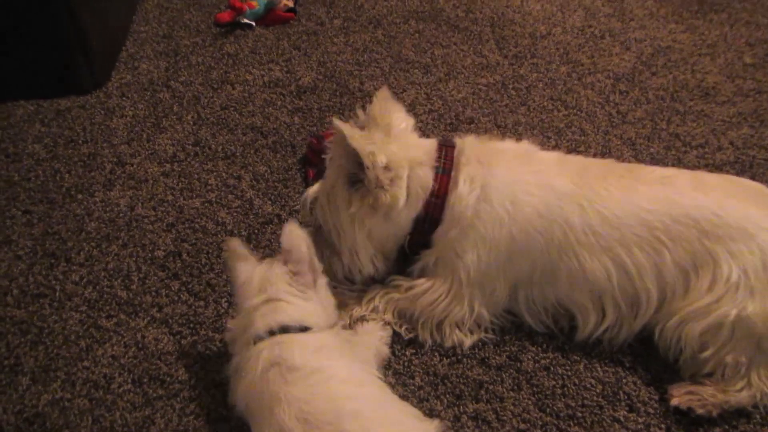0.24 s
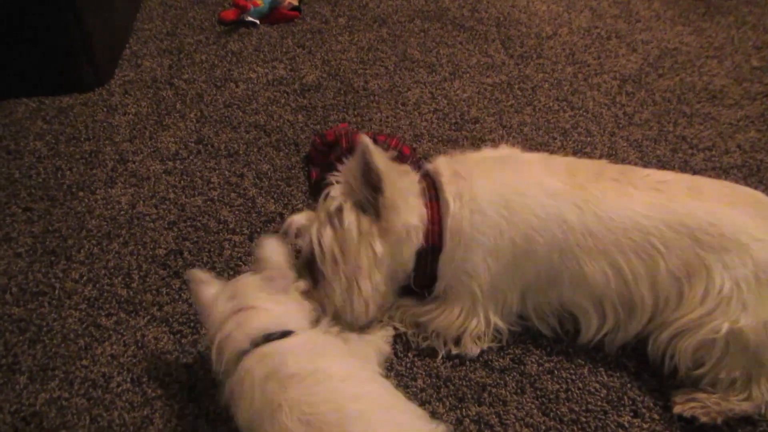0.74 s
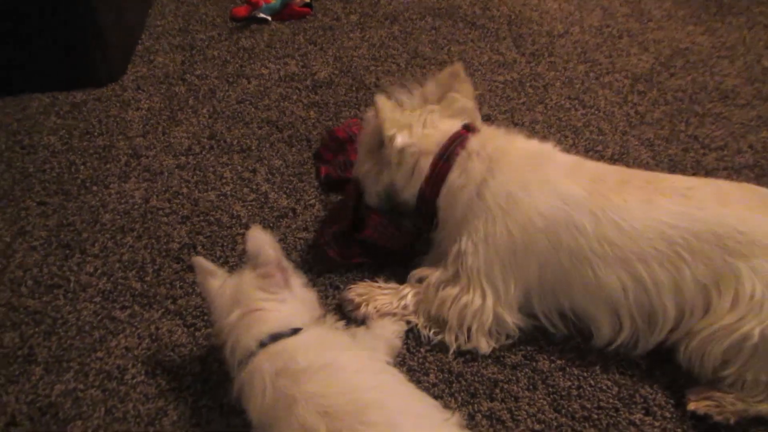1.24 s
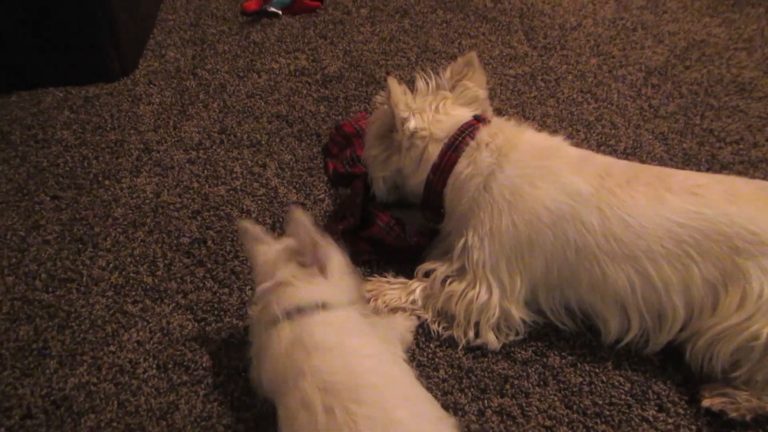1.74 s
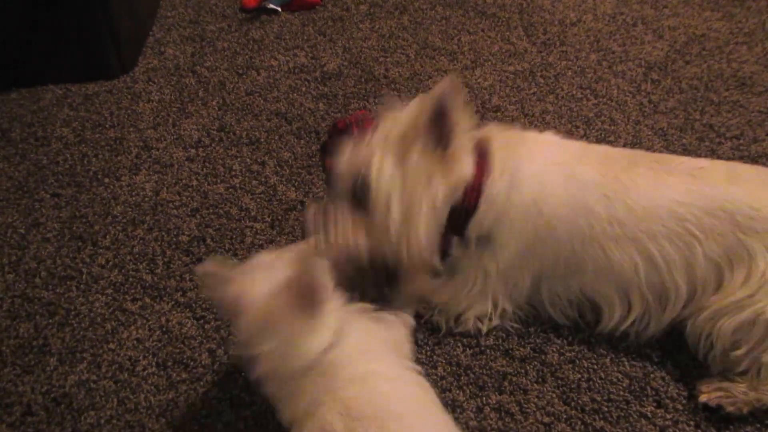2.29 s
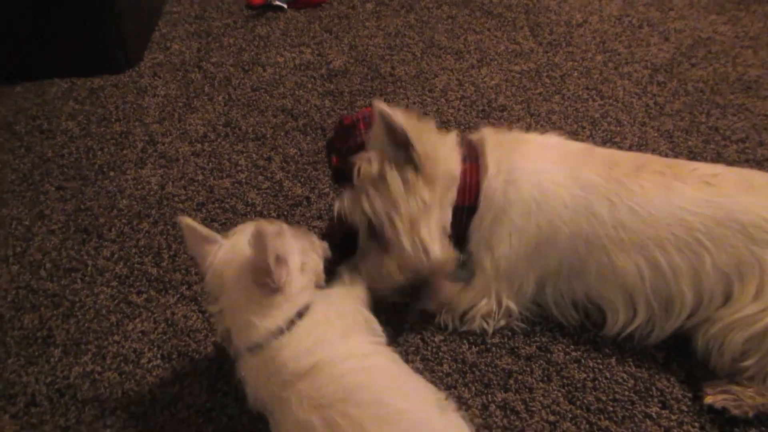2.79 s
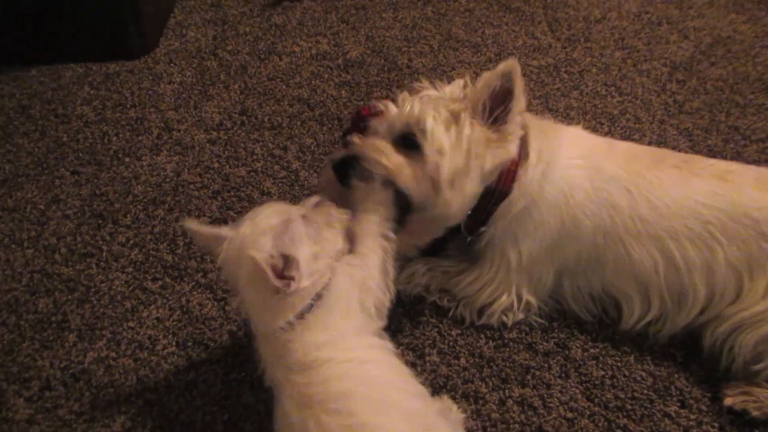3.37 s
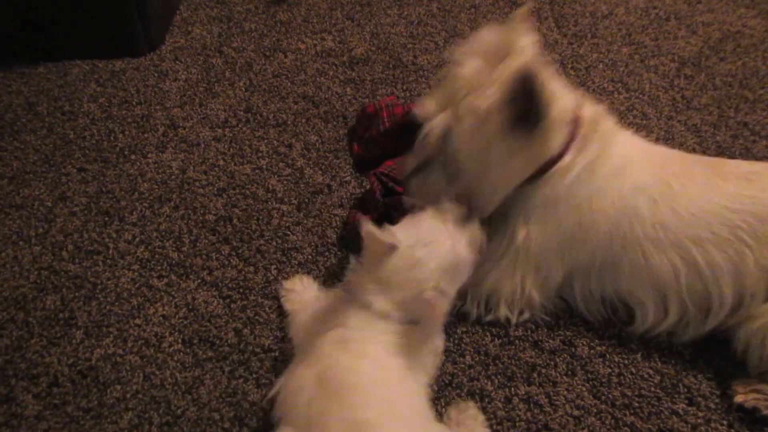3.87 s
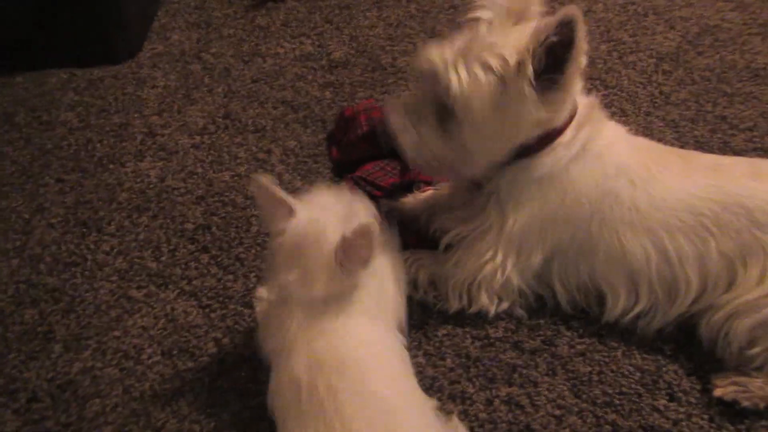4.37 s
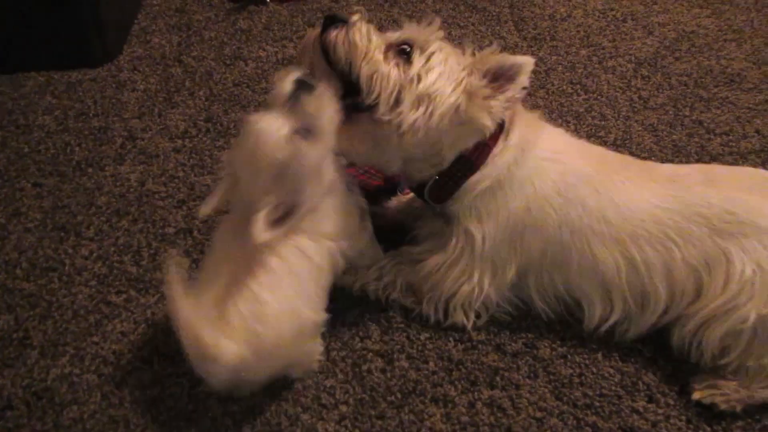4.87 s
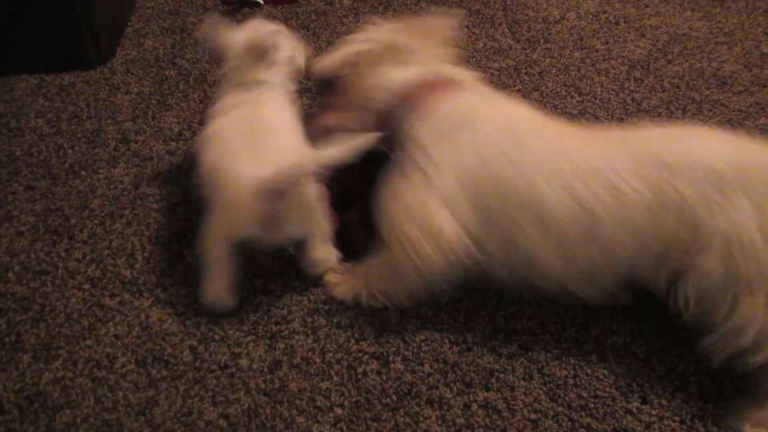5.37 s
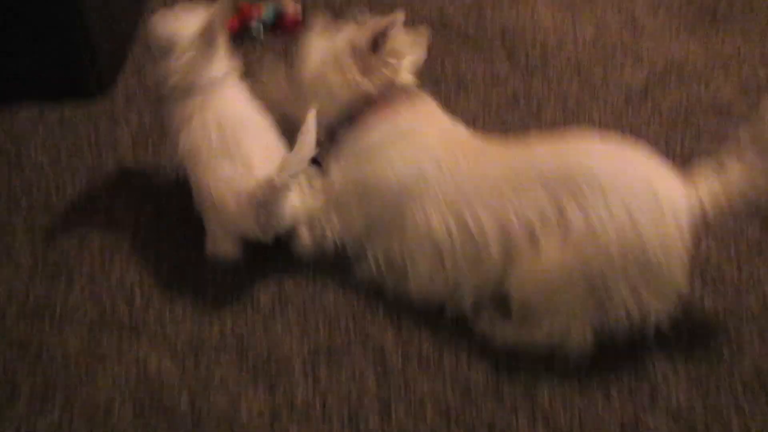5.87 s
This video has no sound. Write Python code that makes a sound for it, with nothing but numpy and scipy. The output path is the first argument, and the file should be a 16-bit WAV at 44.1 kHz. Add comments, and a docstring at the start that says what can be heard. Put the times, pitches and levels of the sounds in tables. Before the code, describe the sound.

Close by in a quiet carpeted living room, two small dogs play over a cloth toy. At first there is mostly low room air, hiss, faint ticks and soft wet mouth sounds. A crisp tag jingle comes around two seconds, then a bump. From four seconds tag clinks, jaw snaps and thuds gather, ending in rustling, scraping and smacking. The room barely echoes.

```python
"""Two small dogs tussle over a soft toy on the carpet of a quiet living room, close to the microphone.
Nearest are a collar tag (clacks against a buckle and beating ring modes) and jaws (resonances of the mouth).
Claws and teeth tick and scrape as noise or clicks through narrow resonances; bumps are damped low modes.
Coats scuff the pile as random fibre slips over floor rumble, and the room answers faintly.
Behind them lie room air, the faint wavering tone of a fan, and microphone hiss."""
import sys
import numpy as np
from scipy import signal
from scipy.fft import rfft, irfft, next_fast_len
from scipy.io import wavfile
from scipy.ndimage import uniform_filter1d

SR = 44100
rng = np.random.default_rng(int(sys.argv[2]) if len(sys.argv) > 2 else 0)


def persist_wave(psi):
    """Save psi, clipped to +-1, as 16-bit WAV."""
    counts = np.round(np.clip(psi, -1, 1) * 32767).astype(np.int16)
    wavfile.write(sys.argv[1], SR, np.atleast_2d(counts).T)


N = 271001
TIME = np.arange(N) / SR  # s

# Tag strikes; the place hit decides which modes sound, and fur how long. Columns: [t/s, clack level/dB,
# clack tilt/dB per octave, middle mode level/dB, top mode level/dB (modes before a 3 dB trim), top mode t60/s]
TAG_STRIKES = [(2.1690, -25.5, -1, -70, -65, .1), (2.1716, -20.5, -3.5, -27, -24.5, 0.19),
               (2.1906, -22, 5, -19, -20, 0.31), (2.4320, -60, 15, -51, -72, .2),
               (3.9741, -34.5, -3, -66, -38.5, 0.32), (4.6748, -27.5, 3.5, -52, -31.5, 0.42),
               (4.9406, -28.5, 3, -64, -42.5, 0.8), (5.2423, -31.5, -6, -68, -44, 0.43),
               (5.5100, -49, 4, -46, -54, .2), (5.5980, -48, 5, -68, -54, .2),
               (5.622, -43, -3, -54, -51, 0.31)]
# Ring modes of the tag, low to high: [f/Hz, share of the strike's t60, split/Hz between twin shapes]
TAG_MODES = [(11475, .42, 45), (12620, .22, 40), (13657, 1, 13)]
LOW_MODE_DB = -9.5  # the tag's low mode relative to its top mode
# Dry clack of tag on buckle, one damped mode a row: [f/Hz, relative level/dB, t60/s]
BUCKLE_MODES = [(2076, -4, 0.01), (2540, 2.5, 0.006), (3390, 0.5, 0.0084), (3770, -5, 0.012),
                (4180, 0.5, 0.0081), (5210, 0.5, 0.0056), (6080, -3, 0.0079), (7100, -2.5, 0.0057),
                (8660, -2, 0.0032), (10700, -7, 0.0037), (11250, -5.5, .003), (11800, -9, .003),
                (15150, -8.5, 0.0027)]

# Wet smacks while chewing: [t/s, cavity level/dB, cavity f/Hz, cavity t60/s, relative upper resonance level/dB]
SMACKS = [(.5590, -46, 3450, .018, -22), (0.6856, -53, 2720, 0.0055, -8), (.8839, -43, 830, 0.024, -4),
          (3.572, -50, 2710, .02, -18), (4.3157, -50, 2930, .004, -3), (4.4809, -50.5, 2950, .004, -3),
          (4.755, -50, 1800, 0.0051, -8), (5.77, -45, 3870, .0055, -1.5), (5.809, -51, 2900, .008, -4),
          (5.9226, -36.5, 3500, 0.0023, -8), (6.0081, -45.5, 2210, .013, 1.5),
          (6.0178, -46.5, 1740, .016, -12)]
# Jaw snaps in three contacts, lips, teeth and rebound: [t/s of the teeth, teeth contact level/dB,
# open cavity f/Hz, gap between contacts/s, relative rebound level/dB, rebound upper resonance f/Hz]
SNAPS = [(4.1440, -29.5, 2850, 0.001235, -5, 3540), (4.6647, -25.5, 1880, .0033, -3.5, 5000)]
# Soft lips and tongue blunt every mouth contact: [f/Hz, relative level/dB]
LIP_SPECTRUM = [(100, -27), (400, -1), (3000, 1), (8300, 3.5), (9500, -8), (14000, -30)]
LIP_HZ, TEETH_HZ, SHUT_HZ = 8160, 5440, 1680  # lips parting, teeth meeting, cavity of the shut mouth
UPPER_RATIO, UPPER_OFFSET_HZ = 1.19, 1240  # in a smack the upper resonance rises with the cavity
KNOCK_DB = -13  # jaw knock, relative, when the cavity sounds at SHUT_HZ
KNOCK_DB_PER_OCTAVE = -11.5  # a small, high cavity knocks less
SNAP_WET_DB, SMACK_WET_DB = -12.5, -11.5  # crackle of saliva, relative to the cavity

# Light ticks of claws and teeth: [t/s, level/dB, f/Hz]
TICKS = [(.1312, -55, 9000), (.574, -54, 6000), (.7832, -54, 6000), (.9139, -53, 13500),
         (1.1880, -56, 14000), (3.0450, -57, 11000), (4.648, -50, 5700), (4.7632, -55, 9500),
         (5.316, -54, 5470), (5.5168, -47, 8000)]
# Teeth and claws dragged over cloth: [t/s, length/s, level/dB before a 6.5 dB trim,
# starting f/Hz, final f/Hz, width/Hz]
SCRAPES = [(5.357, 0.042, -51, 5380, 5000, 900), (5.52, 0.014, -47, 3890, 3170, 1200),
           (5.837, 0.0294, -52.5, 3120, 2690, 600), (5.891, 0.056, -50, 1836, 1820, 350),
           (5.908, 0.024, -35.5, 1633, 1590, 280), (6.098, 0.038, -46.5, 1924, 1856, 810)]

# Bumps on the floor: [t/s, strength/dB before the trim of each part, f/Hz, t60/s]
BUMPS = [(2.781, -12, 276, 0.016), (4.0036, -36, 295, .03), (4.6617, -32, 357, 0.01),
         (4.7050, -36.5, 315, .025), (5.4480, -27.5, 290, 0.0077), (5.546, -33.5, 211, 0.19),
         (5.559, -35, 121, 0.2), (5.5717, -31.5, 252, 0.025), (5.661, -37, 239, .022)]
# Floor and room ringing under a blow: [f/Hz, relative level/dB, t60/s]
FLOOR_MODES = [(110.6, -5, 0.41), (199, -14, 0.17), (285, -27, .12), (384, 5, 0.09), (654, 0, 0.11)]
# Colour of a hard contact: [f/Hz, relative level/dB]
HARD_CONTACT = [(150, -6), (700, 5.5), (1400, -5.5), (2200, 1), (3100, -4), (4000, -25), (5000, -6.5),
                (6000, -32), (9000, -22), (15000, -34)]

# A dog shifts, dragging fur over the pile and loading the floor: [t/s at full level, hold length/s,
# rustle level/dB before a 2.5 dB trim, rumble level/dB before a 1.8 dB trim]
MOVES = [(2.091, 0.075, -54.5, -52), (3.766, 0.044, -54, -52), (4.817, 0.03, -61, -47.5),
         (5.36, .32, -54, -54.5), (5.423, 0.034, -38.5, -58), (5.544, 0.035, -58.5, -42),
         (5.906, 0.094, -53.5, -52)]
# Colour of fur on the carpet pile: [f/Hz, relative level/dB per Hz]
PILE = [(100, -8), (220, -1), (370, -2.5), (520, -9.5), (680, -5), (900, -10), (1500, -12.5), (2400, -12.5),
        (4600, -18.5), (7000, -27), (15000, -32.5)]
# Colour of the loaded floorboards: [f/Hz, relative level/dB per Hz]
BOARDS = [(30, -25), (70, -25), (95, -0.5), (115, 10.5), (165, -4), (230, -11), (330, -8), (500, -13),
          (1200, -31.5)]
MOVE_ATTACK_S = 0.032
RUSTLE_T60, RUMBLE_T60 = 0.08, 0.36  # s; fur stops soon, the floor settles more slowly
FIDGET_DB = -63  # steady rustle of dogs that never lie quite still, before the rustle trim

# How long the room rings: [f/Hz, t60/s]
ROOM_T60 = [(100, 0.3), (400, 0.22), (1000, 0.27), (2500, 0.11), (6000, 0.2), (14000, 0.14)]
# Colour of the room air: [f/Hz, relative level/dB per Hz]
AIR = [(12, -38), (20, -13), (59, 1), (312, -7), (346, -9), (409, -8.5), (636, -10), (691, -12), (927, -15),
       (1120, -10.5), (1380, -15.5), (2100, -16.5), (3000, -22.5), (3900, -58), (6600, -120)]
# Colour of the microphone hiss: [f/Hz, relative level/dB per Hz]
HISS = [(2000, -25), (3200, 0), (4000, -2), (4700, 2), (5400, 0), (7100, -4.5), (8000, 2), (9000, -6),
        (11500, -8.5), (12450, -14.5), (13200, -9.5), (16000, -16)]
AIR_DB, HISS_DB = -53, -60.5
FAN_HZ, FAN_DB = 1103, -70.5  # centre of its wavering pitch and level
RECORDER_LIMIT_HZ = 15950


def tag():
    """Each strike chatters against the buckle and rings the tag; twin modes beat, and a swing varies the ring."""
    clacks, rings, t = np.zeros(N), np.zeros(N), TIME[:SR // 2]
    small_parts = signal.butter(3, 1700, "high", fs=SR, output="sos")  # small parts radiate little bass
    lowest_hz = BUCKLE_MODES[0][0]
    for s, db, tilt_db, middle_db, top_db, t60 in TAG_STRIKES:
        buckle = 0
        for k, (hz, part_db, ring_s) in enumerate(BUCKLE_MODES):
            gain = amp(part_db + tilt_db * np.log2(hz / lowest_hz))
            buckle = buckle + (-1) ** k * gain * mode(hz, ring_s)  # neighbours in opposite phase
        clack = signal.fftconvolve(chatter(t60=0.022, rough=0.12), signal.sosfilt(small_parts, buckle))
        add(clacks, s, amp(db) * crest(clack))

        rings[round(s * SR):] *= .3  # a new contact checks the old ring
        mode_levels = (top_db + LOW_MODE_DB, middle_db, top_db)
        for (hz, share, split_hz), mode_db in zip(TAG_MODES, mode_levels):
            twins = np.sin(2 * np.pi * hz * t) + 0.3 * np.sin(2 * np.pi * (hz + split_hz) * t)
            add(rings, s, amp(mode_db - 3.0) * twins * decay(t, t60 * share))
    swing = amp(3 * wander(20))
    return clacks + rings * swing


def mouths():
    """Single smacks of chewing, and snaps in which the lips tick, the teeth meet and the shut jaw rebounds."""
    out = np.zeros(N)
    for s, db, hz, t60, upper_db in SMACKS:
        upper_hz = UPPER_OFFSET_HZ + UPPER_RATIO * hz
        add(out, s, smack(db, hz, t60, upper_hz, upper_db, SMACK_WET_DB))
    for s, db, open_hz, gap, rebound_db, rebound_hz in SNAPS:
        add(out, s - gap, smack(db - 17, hz=500, t60=.008, upper_hz=LIP_HZ, upper_db=5))
        add(out, s, smack(db, open_hz, t60=0.0086, upper_hz=TEETH_HZ, upper_db=-7.5))
        add(out, s + gap, smack(db + rebound_db, SHUT_HZ, t60=.015, upper_hz=rebound_hz, upper_db=-4))
    return out


def smack(db, hz, t60, upper_hz, upper_db, wet_db=SNAP_WET_DB):
    """Teeth and lips part or meet, ringing the mouth cavity and knocking the jaw; saliva crackles along."""
    lips = impulse(LIP_SPECTRUM)
    force = signal.fftconvolve(chatter(t60=0.0076, rough=0.2), lips)
    knock_db = KNOCK_DB + KNOCK_DB_PER_OCTAVE * np.log2(hz / SHUT_HZ)
    cavity, upper, knock = mode(hz, t60), mode(upper_hz, 0.0083), mode(630, 0.0049)
    rings = ((cavity, 0), (upper, upper_db), (knock, knock_db))
    out = sum(amp(db + part_db) * crest(signal.fftconvolve(force, ring)) for ring, part_db in rings)
    broad_band = np.diff(mode(hz, 0.0021))  # around the cavity pitch
    wet = signal.fftconvolve(chatter(t60=0.058, rough=0.93), broad_band)
    add(out, 0, amp(db + wet_db) * crest(signal.fftconvolve(wet, lips)))
    return out


def ticks():
    """Tiny hard contacts of claws and teeth, with almost no ring."""
    out = np.zeros(N)
    for s, db, hz in TICKS:
        tick = signal.fftconvolve(chatter(t60=0.017, rough=.35), np.diff(mode(hz, 0.0017)))
        add(out, s, amp(db) * crest(tick))
    return out


def scrapes():
    """A run of tiny slips sounds one resonance, which sinks as the contact slides."""
    out = np.zeros(N)
    for s, length, db, start_hz, end_hz, width_hz in SCRAPES:
        count = round(length * SR)
        smooth = signal.butter(2, width_hz / 2, fs=SR, output="sos")
        noise = rng.standard_normal(count) + 1j * rng.standard_normal(count)
        slips = signal.sosfilt(smooth, noise)
        glide_hz = np.linspace(start_hz, end_hz, count)
        turn = np.exp(2j * np.pi * np.cumsum(glide_hz) / SR)  # moves the noise band up to the glide
        scrape = (slips * turn).real * signal.windows.tukey(count, .6)
        add(out, s, amp(db - 6.5) * unit(scrape))
    return out


def bumps():
    """A damped push on the carpet sets the floor ringing; its sharp edge grows faster than the push."""
    out = np.zeros(N)
    floor = sum(amp(db) * mode(hz, t60, size=16384) for hz, db, t60 in FLOOR_MODES)
    small_patch = signal.butter(2, 70, "high", fs=SR, output="sos")  # radiates little deep bass
    soft_pole = np.exp(-2 * np.pi * 900 / SR)  # one-pole lowpass at 900 Hz
    for s, db, hz, t60 in BUMPS:
        push = signal.lfilter([1], [1, -soft_pole], np.diff(mode(hz, t60)))
        add(out, s, amp(db - 4.5) * crest(push))
        add(out, s, amp(db - 22.0) * floor)
        edge = signal.fftconvolve(chatter(t60=0.038, rough=0.042), impulse(HARD_CONTACT))
        add(out, s, amp(2 * db - 1.5) * crest(edge))  # square of the force
    return signal.sosfilt(small_patch, out)


def scuffle():
    """Carpet fibres catch and slip at random under the fur, and the floor rumbles with each move."""
    drag = amp(FIDGET_DB) + sum(amp(db) * gesture(s, length, RUSTLE_T60) for s, length, db, _ in MOVES)
    load = sum(amp(db) * gesture(s, length, RUMBLE_T60) for s, length, _, db in MOVES)
    caught = rng.random(N) < 2200 / SR  # about 2200 slips a second
    strength = amp(3.5 * np.minimum(rng.exponential(1, N), 3))
    slips = caught * np.sign(rng.standard_normal(N)) * strength
    rustle = amp(-2.5) * colour(slips, PILE) * amp(1.06 * wander(75)) * drag
    rumble = amp(-1.8) * colour(rng.standard_normal(N), BOARDS) * load
    return rustle + rumble


def gesture(s, length, t60):
    """Gain over time of one movement: it swells up to s, holds, and dies away."""
    rise = np.clip((TIME - s) / MOVE_ATTACK_S + 1, 0, 1)
    return rise * decay(np.maximum(TIME - s - length, 0), t60)


def room(x, first_s, build_s):
    """Reflections from walls and furniture build up after a gap, each band dying at its own speed."""
    taps = rng.standard_normal(SR // 2) * (rng.random(SR // 2) < 5000 / SR)  # about 5000 a second
    hz, t, bands = signal.stft(taps, SR, nperseg=256)
    tail = signal.istft(bands * decay(t, read(ROOM_T60, hz)[:, None]), SR)[1]
    tail *= np.clip((TIME[:len(tail)] - first_s) / build_s, 0, 1)
    return signal.fftconvolve(x, tail / np.linalg.norm(tail))[:N]


def background():
    """Coloured noise for room air and microphone hiss, and a fan tone wavering in pitch and level."""
    air = amp(AIR_DB) * colour(rng.standard_normal(N), AIR) * amp(.5 * wander(7.7))
    fan_hz = FAN_HZ + 4 * wander(14.3)
    fan_tone = unit(np.sin(2 * np.pi * np.cumsum(fan_hz) / SR))
    fan = amp(FAN_DB + 3.0 * wander(7.6)) * fan_tone
    hiss = amp(HISS_DB) * colour(rng.standard_normal(N), HISS)
    return air + fan + hiss


def amp(db):
    """Decibels to gain."""
    return 10 ** (np.asarray(db) / 20)


def unit(x):
    """Scales to rms 1."""
    return x / np.sqrt(np.mean(x ** 2) + 1e-20)


def crest(x, size=88):
    """Scales so that the loudest stretch of size samples (88 is two milliseconds) has rms 1."""
    return x / np.sqrt(uniform_filter1d(x ** 2, size, mode="constant").max() + 1e-20)


def read(points, hz):
    """Reads a spectrum table on a log-frequency axis."""
    f, value = np.transpose(points)
    return np.interp(np.log(hz + 1), np.log(f), value)


def add(mix, s, sound):
    """Mixes a sound in at s seconds."""
    part = mix[round(s * SR):][:len(sound)]
    part += sound[:len(part)]


def colour(x, points):
    """Gives a long sound a spectrum, at rms 1."""
    size = next_fast_len(N)
    gain = amp(read(points, np.fft.rfftfreq(size, 1 / SR)))
    return unit(irfft(rfft(x, size) * gain, size)[:N])


def impulse(points, size=1024):
    """A causal (minimum-phase) click with the given spectrum."""
    hz = abs(np.fft.fftfreq(size, 1 / SR))
    log_gain = np.log(amp(read(points, hz)))
    spectrum = np.exp(np.conj(signal.hilbert(log_gain)))
    return np.fft.ifft(spectrum).real[:size // 2]


def decay(t, t60):
    """Falls 60 dB in t60 seconds."""
    return np.exp(-np.log(1000) * t / t60)


def mode(hz, t60, size=8192):
    """One damped resonance."""
    t = TIME[:size]
    return np.sin(2 * np.pi * hz * t) * decay(t, t60)


def chatter(t60, rough, size=1024):
    """A first contact followed by a dying spray of random ones."""
    force = rough * rng.standard_normal(size) * decay(TIME[:size], t60)
    force[0] = 1
    return force


def wander(hz):
    """Slow random drift of rms 1, mostly below hz."""
    return colour(rng.standard_normal(N), [(hz, 0), (2 * hz, -40), (4 * hz, -120)])


def scene():
    """The dogs are close to the microphone, so the room answers only faintly."""
    metal, thuds = tag(), bumps()
    small_contacts = mouths() + ticks() + scrapes()
    bright_echo = room(amp(-13.5) * metal + amp(-30) * small_contacts, first_s=0.0013, build_s=0.049)
    low_echo = room(amp(-15) * thuds, first_s=0.0055, build_s=0.0056)
    direct = metal + small_contacts + thuds + scuffle()
    return (direct + bright_echo + low_echo + background())[None]


def record(dry):
    """The recorder's band limit, a steep linear-phase lowpass."""
    lowpass = signal.firwin(511, RECORDER_LIMIT_HZ, window=("kaiser", 9), fs=SR)
    return signal.oaconvolve(dry, lowpass[None], "same")


dry = scene()
out = record(dry)
persist_wave(out)
```